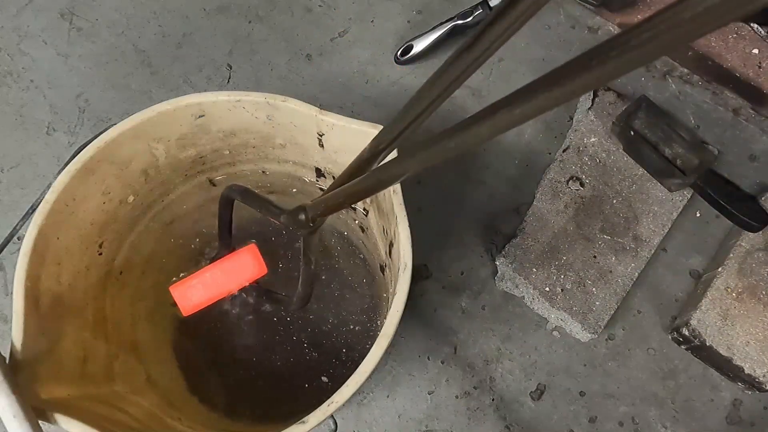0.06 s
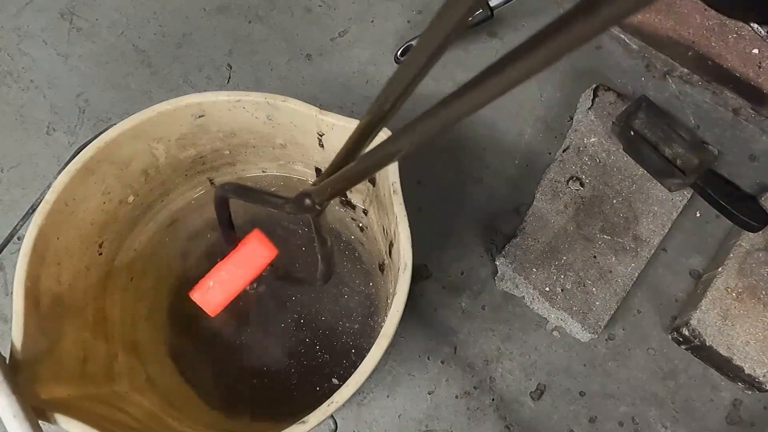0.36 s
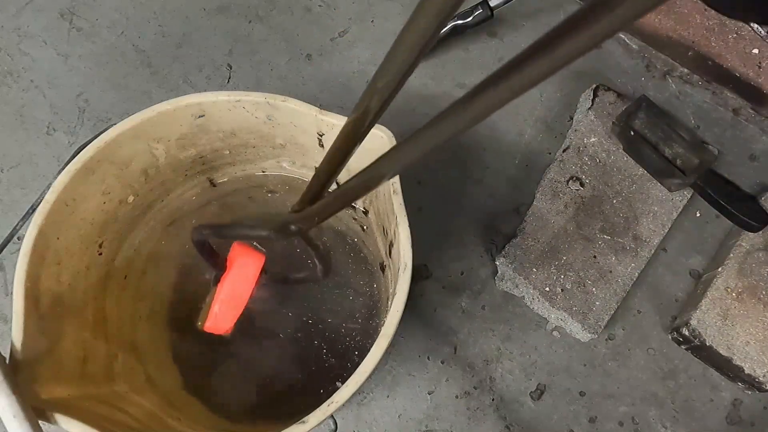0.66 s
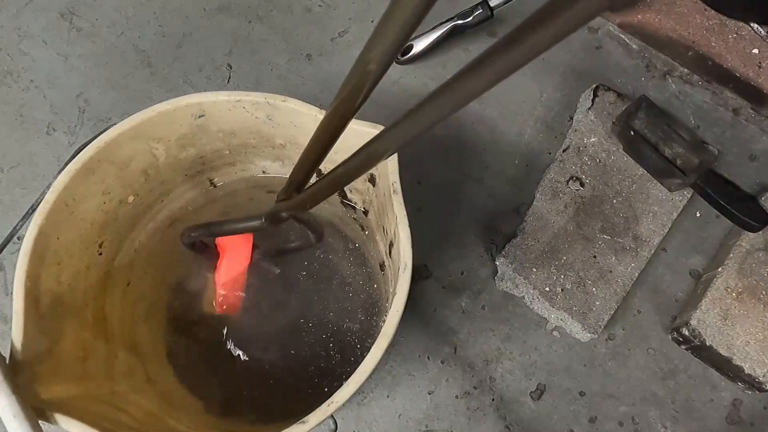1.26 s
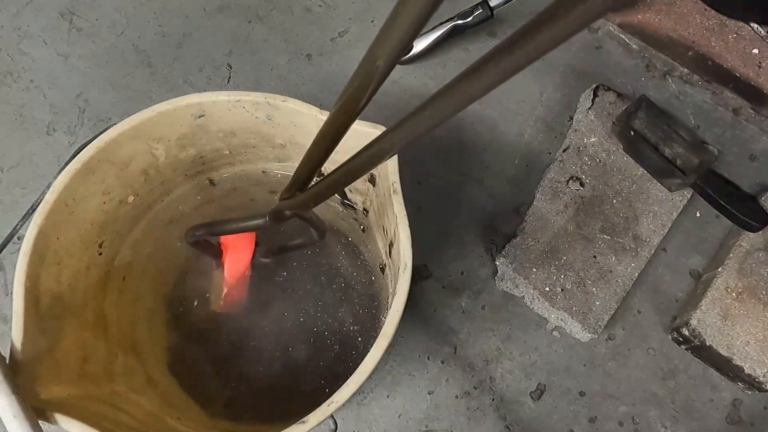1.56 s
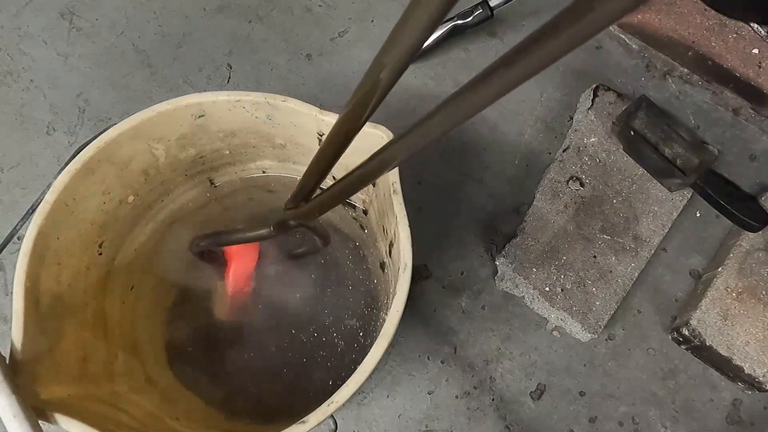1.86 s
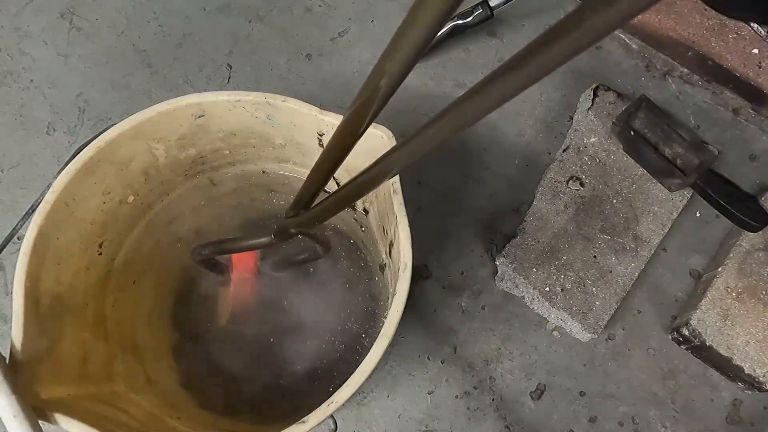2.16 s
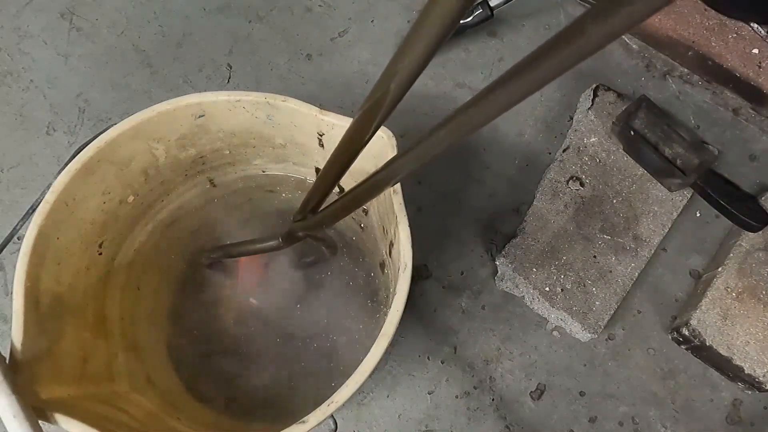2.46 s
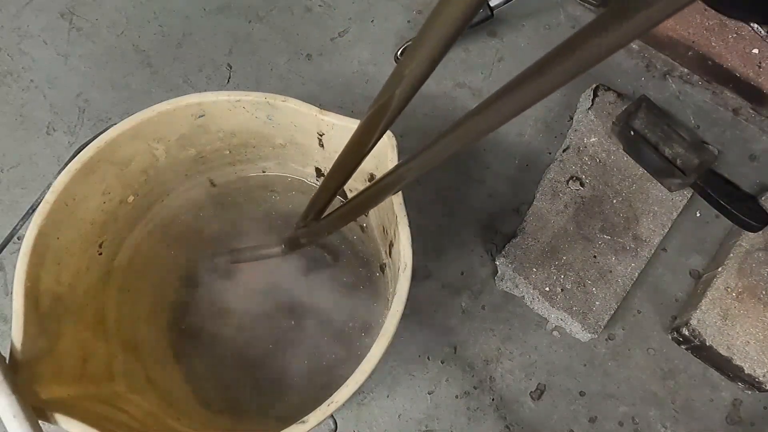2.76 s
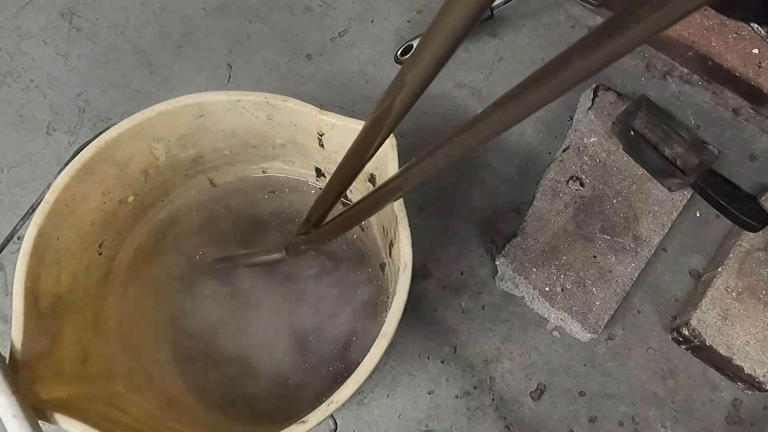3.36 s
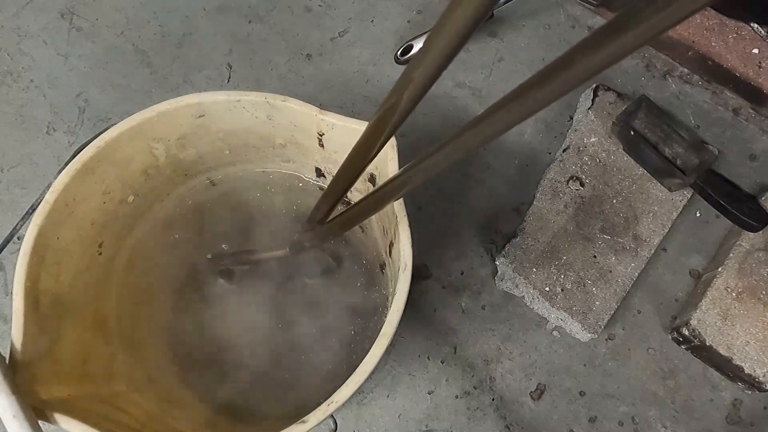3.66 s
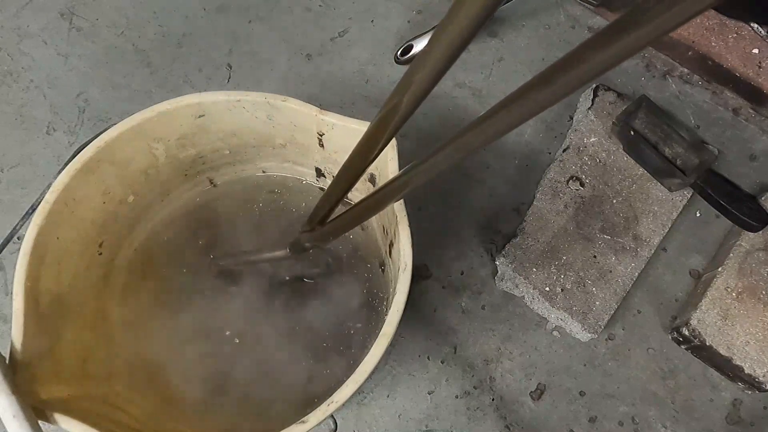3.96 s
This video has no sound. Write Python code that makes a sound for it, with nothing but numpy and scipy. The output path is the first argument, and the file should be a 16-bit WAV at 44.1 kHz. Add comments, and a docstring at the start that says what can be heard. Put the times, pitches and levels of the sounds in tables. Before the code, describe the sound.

Hot steel sizzles in a plastic bucket of water from the start, close by, with spits, splutters and thin steam whistles. Two soft, dull thumps come at about 0.5 seconds. Near 1.8 seconds boiling begins, its gurgling bubbles growing larger and deeper. From about 2.8 seconds a hollow note throbs in churning water. A sputter and short steam squeak come at 3.8 seconds. A faint workshop hum runs throughout.

```python
"""A red-hot steel block, held in tongs, is lowered into a plastic bucket of water in a humming workshop.
First, water flashes to steam on the steel: it sizzles, whistles, splutters and spits. Two dull thumps
follow. Just before two seconds, boiling sets in, and the bubbles grow larger and deeper as the block
sinks. Then the steam pocket round the block throbs with a hollow note while the water churns.
Near the end the top goes under with a sputter, and a pinched jet of steam squeaks."""
import sys
import numpy as np
from scipy import signal
from scipy.fft import rfft, irfft
from scipy.io import wavfile

SR = 44100
rng = np.random.default_rng(int(sys.argv[2]) if len(sys.argv) > 2 else 0)


def to_wav(sig):
    """Store sig (one row per channel, or 1-D mono) as 16-bit WAV at the path in sys.argv[1].

    Samples outside -1..1 are clipped; the rate is SR.
    """
    pcm = np.clip(np.atleast_2d(sig), -1, 1) * 32767
    pcm = np.round(pcm).astype(np.int16)
    wavfile.write(sys.argv[1], SR, pcm.T)  # frames by channels


N = 176400
TIME = np.arange(N) / SR
FFT_SIZE = 2 ** 18
BIN_HZ = np.maximum(np.fft.rfftfreq(FFT_SIZE, 1 / SR), 1)

# A "colour" says how strong a sound is at each frequency, from bass to treble.
# machine hum: f/Hz, level/dB
HUM_TONES = [(59, -48), (118.3, -48.5)]
# workshop rumble: f/Hz, level/dB
RUMBLE_COLOUR = [(8, -13.5), (20, -27), (30, -15.5), (48, 0.5), (65, -2.5), (90, -4), (130, -6), (170, -10),
                 (230, -22), (500, -32), (2000, -25), (15000, -102)]
# the rumble swells: t/s, length/s, boost/dB
RUMBLE_SWELLS = [(0.754, 0.068, 7), (1.593, 1.5, 4)]
# fine hiss at the waterline: t/s, level/dB
HISS_LEVEL = [(0, -30.5), (.1, -29), (.22, -33.5), (.45, -36.5), (.6, -41.5), (.74, -37.5), (.87, -36),
              (1.02, -39.5), (1.2, -36), (1.34, -33), (1.45, -39.5), (1.57, -38), (1.75, -34.5), (1.9, -35),
              (2.05, -42.5), (2.22, -35), (2.54, -40), (2.7, -37), (2.9, -36.5), (3.06, -44), (3.17, -42.5),
              (3.29, -40), (3.4, -46), (3.6, -47.5), (3.73, -53.5), (3.82, -40), (4, -48)]
# that hiss: f/Hz, level/dB
HISS_COLOUR = [(2500, -39), (4500, 0), (6500, -4.5), (7400, -1), (8300, -4.5), (9200, -6), (10500, -8.5),
               (12000, -10.5), (13100, -17), (14100, -26), (15000, -34)]
# droplets fry on the steel: t/s, level/dB
FRYING_LEVEL = [(0, -21.5), (.08, -26.5), (.21, -31.5), (.38, -32), (.5, -32), (.61, -37.5), (.69, -32),
                (.93, -32), (1.04, -34.5), (1.22, -31), (1.36, -34.5), (1.45, -37), (1.57, -36.5),
                (1.71, -31.5), (1.84, -30), (2.04, -36.5), (2.18, -30.5), (2.42, -33.5), (2.88, -33),
                (3.14, -38), (3.29, -35.5), (3.42, -40.5), (3.75, -38), (4, -29)]
# that frying: f/Hz, level/dB
FRYING_COLOUR = [(1500, -14.5), (2000, -9), (2250, -11), (2630, -3), (3000, -5), (3400, -1), (3700, 1.5),
                 (3930, -0.5), (4350, -1.5), (4900, -1.5), (5350, -4), (5800, -1.5), (6500, -7.5),
                 (7000, -1.5), (8500, -14), (15000, -64.5)]
# steam bubbles collapse and crackle: t/s, level/dB
CRACKLE_LEVEL = [(0.0, -36.5), (0.06, -30), (0.17, -35), (0.65, -44), (0.93, -35.5), (1.0, -42.5),
                 (1.24, -37.5), (1.45, -42.5), (1.76, -35), (2.58, -37), (2.66, -29.5), (2.7, -36.5),
                 (2.92, -33), (3.02, -35.5), (3.74, -35.5), (4.0, -31.5)]
# that crackle: f/Hz, level/dB
CRACKLE_COLOUR = [(150, -20), (270, -7), (360, 1), (430, 6.5), (520, 7), (650, -2), (810, -5.5), (1030, 0),
                  (1300, 0), (1550, 1.5), (1830, 0.5), (2050, -5), (2280, -9.5), (2620, -6.5), (3000, -16),
                  (5000, -11), (9000, -19.5), (14000, -51)]
# sputter as the top of the block goes under: t/s, level/dB
SPUTTER_LEVEL = [(0, -69), (2.4, -52), (2.95, -46), (3.45, -44), (3.74, -38), (3.81, -35.5), (3.87, -36.5),
                 (4, -37.5)]
# that sputter: f/Hz, level/dB
SPUTTER_COLOUR = [(1200, -11), (2200, -4), (2600, 5), (3100, 7), (3800, -4), (4700, -6), (6200, 2),
                  (8000, -22), (11000, -27), (14000, -53)]
# steam squeezes out: t/s, length/s, f/Hz, level/dB
WHISTLES = [(-.05, 0.1, 6740, -28), (-.03, 0.25, 3400, -35), (1.144, 0.35, 4510, -38),
            (1.652, 0.27, 4300, -34), (2.14, 0.08, 4360, -37.5), (2.3, 0.83, 4400, -43),
            (3.233, .1, 4200, -41), (3.78, 0.02, 3450, -31)]
# water splutters round the dipping block: t/s, length/s, level/dB
SPLUTTERS = [(-0.004, 0.13, -31.5), (0.725, 0.27, -40), (0.89, 0.019, -33), (1.05, 0.11, -41)]
# water spits off the steel: t/s, relative level/dB
SPITS = [(0.03, 6), (.049, -1), (.066, 2.5), (.097, -1), (0.108, 1), (.283, 3), (.322, 0), (0.372, 1),
         (.866, 3.5), (0.876, -1), (.907, 4.5), (0.939, 0), (0.944, 2), (1.863, -4)]
# those spits: f/Hz, level/dB
SPIT_COLOUR = [(150, -10), (290, -10.5), (440, 4), (600, -2), (800, -18), (1050, -10), (1800, -22),
               (2250, -14), (3100, -17.5), (3550, -2), (5000, -24), (7500, -37), (14000, -59)]
# lone droplets snap: t/s, level/dB
SNAPS = [(0.282, -18), (0.375, -7), (.576, -12), (1.127, -9), (1.225, -11), (1.235, -9), (1.674, -13),
         (1.733, -6), (1.774, -5), (1.863, -9)]
# dull low thumps: t/s, level/dB
THUMPS = [(.533, -21), (.572, -18)]
# small bubbles near the surface: t/s, level/dB
SIMMER_LEVEL = [(0, -55), (1.0, -50.5), (1.62, -44), (1.73, -37), (1.79, -32), (1.89, -42), (1.97, -34),
                (2.1, -39), (2.18, -28.5), (2.4, -37.5), (2.49, -33), (2.65, -35), (2.9, -32.5), (3.1, -41),
                (4, -41)]
# boiling under water, with its typical bubble pitch: t/s, level/dB, f/Hz
BOIL_CURVE = [(0, -59, 830), (1.58, -60, 714), (1.78, -34.5, 627), (1.93, -33, 620), (2.06, -25.5, 606),
              (2.13, -27.5, 624), (2.27, -25.5, 587), (2.47, -25.5, 518), (2.68, -25.5, 499),
              (2.85, -28, 513), (2.99, -24.5, 548), (3.17, -24.5, 459), (3.4, -29, 517), (4, -30.5, 487)]
# how the bucket shapes the bubble sound: f/Hz, level/dB
BUCKET_COLOUR = [(100, -8.5), (260, -5), (320, 5.5), (385, 6.5), (428, -7), (470, 4.5), (530, 0), (620, -1),
                 (720, 2.5), (820, -2.5), (940, 3), (1030, 4.5), (1170, 3.5), (1330, -2), (1600, -7.5),
                 (4000, -5.5)]
# single large bubbles: t/s, f/Hz, level/dB
GURGLES = [(1.782, 910, -26), (2.049, 640, -22), (2.193, 1130, -27), (2.264, 500, -16), (2.313, 545, -18),
           (2.37, 492, -21), (2.394, 495, -26), (2.494, 1094, -22), (2.563, 527, -19.5), (2.662, 1800, -36),
           (2.679, 473, -19.5), (2.797, 947, -23), (2.872, 1560, -24), (2.93, 520, -20), (3.079, 1062, -25),
           (3.647, 1100, -24.5)]
# hollow sound of the steam pocket: t/s, level/dB
POCKET_LEVEL = [(0, -77), (1.6, -56), (2.1, -41), (2.3, -38.5), (2.8, -30), (3.3, -29.5), (4, -27)]
# where the water and bucket ring: f/Hz, base width/Hz, level/dB
POCKET_RESONANCES = [(239, 38, -10.5), (324.2, 20.6, -1.5), (377.6, 15.2, 0.5), (503, 65, -8),
                     (602, 28, -14.5), (1061, 52, -16.5)]
# the pocket throbs: t/s, length/s, level/dB
THROBS = [(2.2, 0.12, -29), (2.447, 0.028, -23.5), (2.598, 0.026, -29.5), (2.797, 0.095, -29),
          (2.914, 0.07, -18.5), (3.004, 0.056, -20), (3.149, 0.025, -18.5), (3.228, 0.038, -18),
          (3.333, 0.099, -13), (3.494, 0.066, -20.5), (3.683, 0.043, -20), (3.736, 0.018, -18.5),
          (3.878, 0.046, -19), (3.954, 0.034, -26.5)]
# churning water: f/Hz, level/dB
CHURN_COLOUR = [(50, -29), (110, -11.5), (150, -1.5), (190, -7.5), (250, -2), (300, -6), (500, -7),
                (2000, -84)]
# a pinched steam jet: t/s, f/Hz, level/dB
SQUEAK_CURVE = [(3.775, 3510, -56), (3.786, 3100, -32), (3.797, 2940, -39), (3.809, 2560, -38),
                (3.818, 2470, -23), (3.827, 2480, -43), (3.85, 2350, -58)]
# the hiss rings in the gap between water and wall: f/Hz, width/Hz, level/dB
GAP_RESONANCES = [(1834, 154, -11), (2610, 72, -15), (3410, 51, -4.5), (4310, 105, -5.5), (7460, 260, -15)]
# the bucket wall throws the sound back: delay/s, level/dB
WALL_ECHOES = [(.0019, -34.5), (.0031, -27.5), (.0047, -16)]
# sound scattered by bucket and room, against the direct sound: f/Hz, level/dB
SCATTER_COLOUR = [(50, -23), (350, -20.5), (700, -16.5), (1400, -13.5), (2600, -7.5), (5000, -11),
                  (8000, -7.5), (10500, -4.5), (13000, 0.5), (15000, 7)]
# how much louder the left ear is than the right: f/Hz, level/dB
LEFT_BALANCE = [(100, 0.8), (400, -0.45), (1200, 0.5), (3000, 0.4), (5500, 2.1), (8000, 2.5), (11000, 2),
                (12500, 0), (15000, -.5)]


def from_db(db):
    """Turn decibels into a number to multiply by."""
    return 10 ** (np.asarray(db) / 20)


def rms_one(x):
    """Scale a sound so its average strength (rms) is 1."""
    return x / np.sqrt(np.mean(x ** 2) + 1e-20)


def in_time(rows):
    """Join a table's points with lines: one curve for each column after the time."""
    times, *columns = np.transpose(rows)
    return [np.interp(TIME, times, column) for column in columns]


def at_bins(points):
    """Fill in a table's values at every frequency."""
    hz, value = np.transpose(points)
    return np.interp(np.log(BIN_HZ), np.log(hz), value)


def drift(hz):
    """A smooth random wander, about 1 in size; a higher hz wanders faster."""
    step, warm_up = 40, 2000
    r = np.exp(-2 * np.pi * step * hz / SR)
    noise = rng.standard_normal(N // step + warm_up + 2)
    slow = signal.lfilter([1], [1, -2 * r, r * r], noise)[warm_up:]
    return np.interp(np.arange(N) / step, np.arange(len(slow)), rms_one(slow))


def swell(start, length):
    """A rounded rise and fall of height 1."""
    progress = np.clip((TIME - start) / length, 0, 1)
    return (4 * progress * (1 - progress)) ** .7


def coloured(x, colour):
    """Give a sound a colour; plain white noise would keep its power."""
    cepstrum = irfft(np.log(rms_one(from_db(at_bins(colour)))))
    # this makes the filter ring after a click, never before it
    one_sided = np.r_[1, np.full(FFT_SIZE // 2 - 1, 2), np.zeros(FFT_SIZE // 2)]
    response = np.exp(rfft(cepstrum * one_sided))
    return irfft(rfft(x, FFT_SIZE) * response)[:N]


def resonance(x, hz, *widths_hz):
    """Let through a ringing band round one pitch, filtering once for each width."""
    for width in widths_hz:
        r = np.exp(-np.pi * width / SR)
        feedback = [1, -2 * r * np.cos(2 * np.pi * hz / SR), r * r]
        x = signal.lfilter(np.array([1, 0, -1]) * (1 - r * r) / 2, feedback, x + 1e-18)
    return x


def pops(per_s, size_db):
    """Random clicks of uneven size."""
    sizes = from_db(size_db * np.minimum(rng.exponential(1, N), 4)) * rng.choice([-1, 1], N)
    return rms_one(sizes * (rng.random(N) < per_s / SR))


def ring(t, hz, cycles, rise):
    """A tone that starts softly and fades 60 dB over so many cycles; rise bends it upward."""
    age = t * hz / cycles
    tone = np.sin(2 * np.pi * hz * t * (1 + rise * age))
    return tone * np.exp(-np.log(1000) * age) * (1 - np.exp(-2 * t * hz))


def workshop(rumble_db=-40, fade_db_per_s=-0.5):
    """A machine hums over a low rumble that swells twice."""
    hum = sum(from_db(db) * np.sqrt(2) * np.sin(2 * np.pi * (hz * TIME + rng.random()))
              for hz, db in HUM_TONES)
    level_db = rumble_db + fade_db_per_s * (TIME - TIME.mean())
    level_db += sum(db * swell(start, length) for start, length, db in RUMBLE_SWELLS)
    return hum + from_db(level_db) * rms_one(coloured(rng.standard_normal(N), RUMBLE_COLOUR))


def fizz(low_hz, high_hz, per_s, cycles, bands=16, ring_samples=400, swarm_db=2.5):
    """Tiny bubbles burst and ring briefly, each at its own pitch; similar sizes come in swarms."""
    swarms = np.array([drift(8) for _ in range(bands)])
    chance, place, sign = rng.random(N), rng.random(N), rng.choice([-1, 1], N)
    starts = np.flatnonzero(chance < per_s / SR)
    hz = low_hz * (high_hz / low_hz) ** place[starts]
    band = (place[starts] * bands).astype(int)
    gain = sign[starts] * hz * from_db(swarm_db * swarms[band, starts])
    turns = np.outer(hz, TIME[:ring_samples])
    rings = gain[:, None] * np.sin(2 * np.pi * turns) * np.exp(-np.log(1000) * turns / cycles)
    positions = starts[:, None] + np.arange(ring_samples)
    return rms_one(np.bincount(positions.ravel(), rings.ravel(), N)[:N])   # add up all the rings


def sizzle():
    """Water flashes to steam on the hot steel: fine hiss, frying, crackle and a late sputter."""
    flutter = drift(16)
    hiss = pops(14000, 2.8) + from_db(-8) * fizz(5035, 14700, per_s=4600, cycles=120)
    frying = pops(9000, 0.81) + from_db(-8.5) * fizz(2492, 7915, per_s=3000, cycles=73)
    layers = [(hiss, HISS_COLOUR, HISS_LEVEL, 0.5 + 1.05 * drift(28)),
              (frying, FRYING_COLOUR, FRYING_LEVEL, -2.5 + 1.03 * flutter),
              (pops(2500, 1.9), CRACKLE_COLOUR, CRACKLE_LEVEL, 1.5 + 0.78 * flutter),
              (fizz(2102, 9780, per_s=6500, cycles=120), SPUTTER_COLOUR, SPUTTER_LEVEL, .5 * flutter)]
    return sum(rms_one(coloured(x, colour)) * from_db(in_time(level)[0] + extra_db)
               for x, colour, level, extra_db in layers)


def whistles(width_share=0.056):
    """Steam squeezes out in hoarse whistles, each a narrow band of noise."""
    out = np.zeros(N)
    for start, length, hz, db in WHISTLES:
        steam = resonance(rng.standard_normal(N), hz, width_share * hz, 4 * width_share * hz)
        out += from_db(db) * swell(start, length) * rms_one(steam)
    return out


def splutters(hz=473, width_hz=95):
    """Runs of small wet pops ring in the bucket as the block dips."""
    wet = rms_one(resonance(pops(500, 1.4), hz, width_hz, 2 * width_hz))
    return wet * sum(from_db(db) * swell(start, length) for start, length, db in SPLUTTERS)


def spits(level_db=-12, spray_db=-9.5, decay_s=0.0014):
    """Water spits off the steel: each spit is a click with a short spray behind it."""
    out, t = np.zeros(N), TIME[:SR // 20]
    for start, db in SPITS:
        burst = from_db(spray_db) * rng.standard_normal(len(t)) * np.exp(-t / decay_s)
        burst[0] = -1   # the click
        i = int(start * SR)
        out[i:i + len(t)] += from_db(level_db + db) * burst
    return coloured(out, SPIT_COLOUR)


def snaps():
    """Lone droplets snap with single bright clicks."""
    out = np.zeros(N)
    for start, db in SNAPS:
        out[int(start * SR)] = -from_db(db)
    return coloured(out, FRYING_COLOUR)


def thumps():
    """Two soft knocks in the bass."""
    return sum(from_db(db) * ring(np.clip(TIME - start, 0, .5), hz=61.6, cycles=5.7, rise=0)
               for start, db in THUMPS)


def bubbles(pitch, spread_octaves, cycles, per_s=850, size_db=2.5):
    """Bubbles ring in the bucket as they break away, rising a little in pitch."""
    out, t = np.zeros(N + SR), TIME[:SR // 16]
    chance, detune, size = rng.random(N), rng.standard_normal(N), rng.standard_normal(N)
    sign = rng.choice([-1, 1], N)
    for i in np.flatnonzero(chance < per_s / SR):
        hz = pitch[i] * 2 ** (spread_octaves * detune[i])
        gain = sign[i] * from_db(size_db * min(size[i], 2)) * np.sqrt(pitch[i])
        out[i:i + len(t)] += gain * ring(t, hz, cycles, rise=0.016)
    return rms_one(coloured(out[:N], BUCKET_COLOUR))


def boil(simmer_hz=1036):
    """Small bubbles simmer at the surface; those below grow and deepen as the block sinks."""
    level_db, pitch = in_time(BOIL_CURVE)
    simmer = bubbles(np.full(N, simmer_hz), spread_octaves=0.25, cycles=17)
    below = bubbles(pitch, spread_octaves=0.24, cycles=16.2)
    return from_db(in_time(SIMMER_LEVEL)[0]) * simmer + from_db(level_db) * below


def gurgles():
    """Single large bubbles ring out above the boil."""
    return sum(from_db(db) * ring(np.clip(TIME - start, 0, .5), hz, cycles=50, rise=0.017)
               for start, hz, db in GURGLES)


def steam_pocket(note_hz=379.5, note_db=1, wobble_share=0.012, flutter_db=0.76):
    """Collapsing steam keeps water and bucket ringing; the strongest note wavers and throbs."""
    knocks, level = pops(1200, 1.15), from_db(in_time(POCKET_LEVEL)[0])
    ringing = rms_one(sum(from_db(db) * resonance(knocks, hz, 1.05 * width, 4 * width)
                          for hz, width, db in POCKET_RESONANCES))
    throbs = sum(from_db(db) * swell(start, length) for start, length, db in THROBS)
    phase = 2 * np.pi * np.cumsum(note_hz * (1 + wobble_share * drift(19))) / SR
    note = from_db(flutter_db * drift(37)) * np.sin(phase)
    return level * ringing + (level * from_db(note_db) + throbs) * note


def churn(relative_db=-9.5):
    """Water heaves round the block with a low, lumpy grumble that grows with the steam pocket."""
    grumble = rms_one(coloured(pops(500, 5.4), CHURN_COLOUR))
    return from_db(relative_db + in_time(POCKET_LEVEL)[0]) * grumble


def squeak(wobble_share=0.0116):
    """A pinched steam jet gives a short, unsteady, falling tone."""
    hz, db = in_time(SQUEAK_CURVE)
    sounding = (TIME > SQUEAK_CURVE[0][0]) & (TIME < SQUEAK_CURVE[-1][0])
    phase = 2 * np.pi * np.cumsum(hz * (1 + wobble_share * drift(153))) / SR
    return sounding * from_db(db) * np.sin(phase)


def bucket_wall(x, shift_share=0.024):
    """The gap by the wall rings faintly, and short echoes shift as the block moves."""
    x = x + sum(from_db(db) * resonance(x, hz, width) for hz, width, db in GAP_RESONANCES)
    return x + sum(from_db(db) * np.interp(TIME - delay * (1 + shift_share * drift(1)), TIME, x, left=0)
                   for delay, db in WALL_ECHOES)


def room_stereo(x, fade_s=0.12, first_echo_s=0.0017, left_lag_s=.000014):
    """Echoes differ between the ears, most in the treble, which also leans to the left."""
    tail = rng.standard_normal(N) * np.exp(-np.log(1000) * TIME / fade_s) * (TIME > first_echo_s)
    direct = rfft(x, FFT_SIZE)
    scramble = np.exp(1j * np.angle(rfft(tail, FFT_SIZE)))   # changes timing, not colour
    scattered = direct * scramble * from_db(at_bins(SCATTER_COLOUR))
    lag = np.exp(-1j * np.pi * np.minimum(BIN_HZ, 2000) * left_lag_s)
    lean = from_db(at_bins(LEFT_BALANCE) / 2) * lag   # each ear takes half, in opposite directions
    return np.array([irfft((direct + ear * scattered) * lean ** ear)[:N] for ear in (1, -1)])


def scene():
    """The hot block cools in the bucket, with the workshop behind it."""
    surface = bucket_wall(sizzle() + snaps()) + whistles() + squeak() + spits() + splutters()
    return room_stereo(surface + boil() + gurgles() + steam_pocket() + churn() + thumps() + workshop())


def record(dry):
    """Cut away the highest treble, above 15100 Hz."""
    return signal.sosfilt(signal.ellip(10, .1, 80, 15100, fs=SR, output="sos"), dry)


dry = scene()
out = record(dry)
to_wav(out)
```